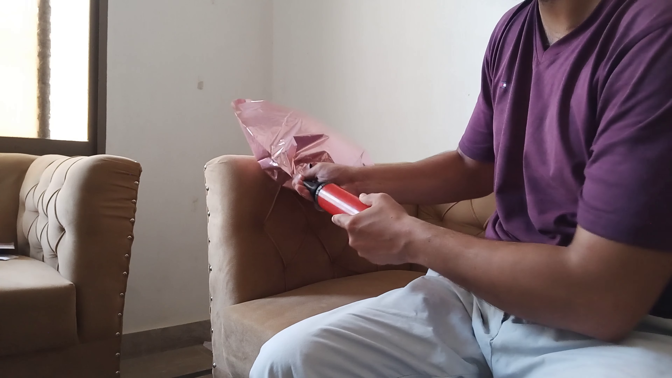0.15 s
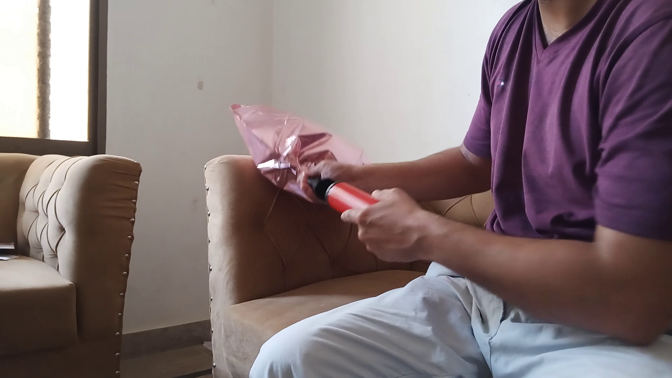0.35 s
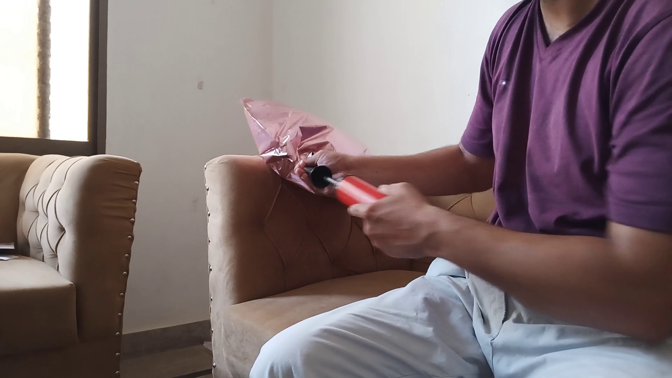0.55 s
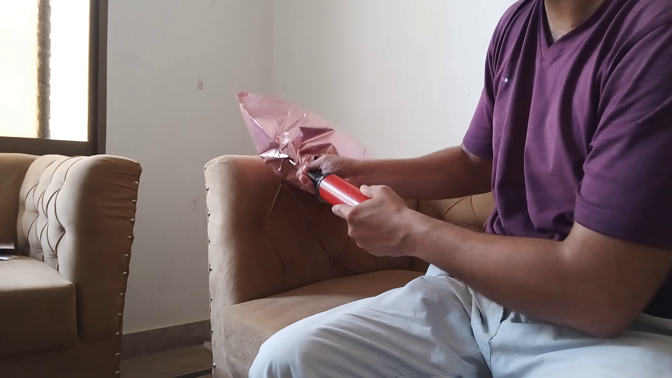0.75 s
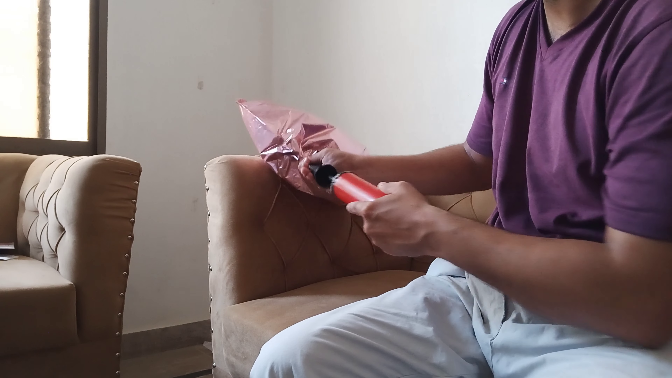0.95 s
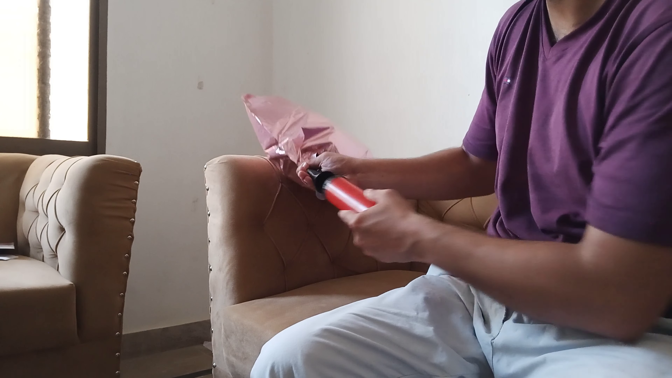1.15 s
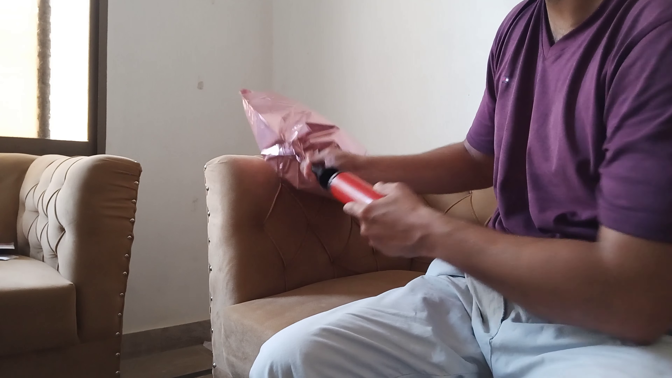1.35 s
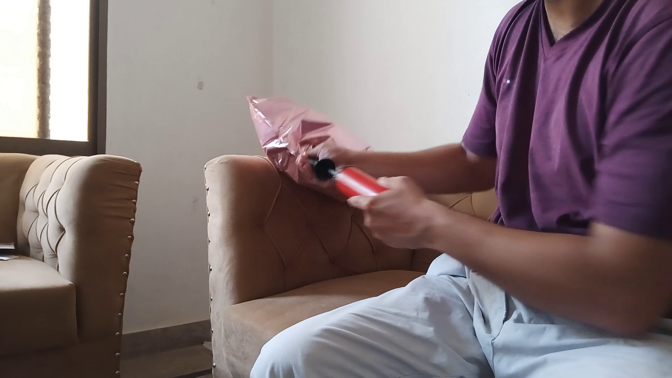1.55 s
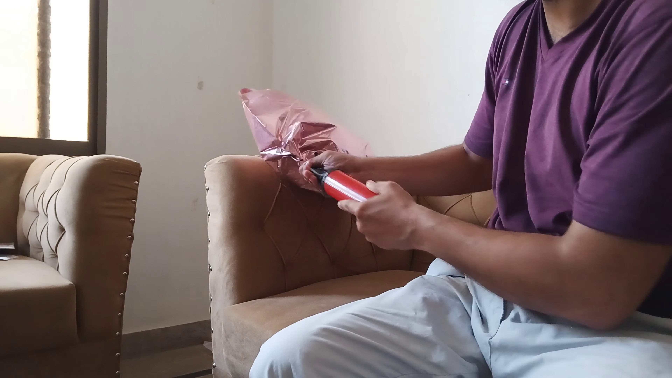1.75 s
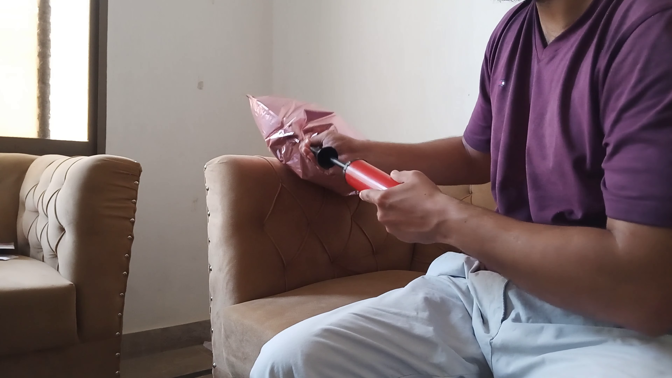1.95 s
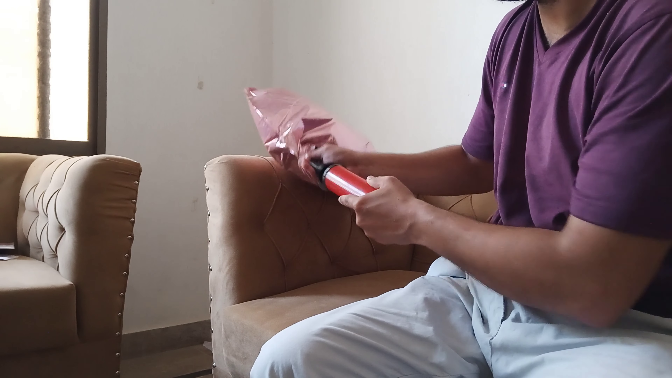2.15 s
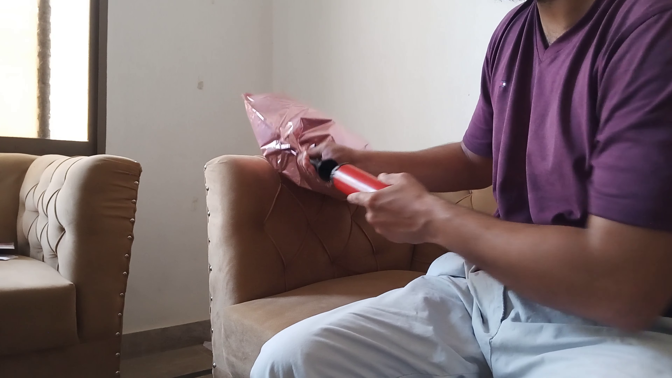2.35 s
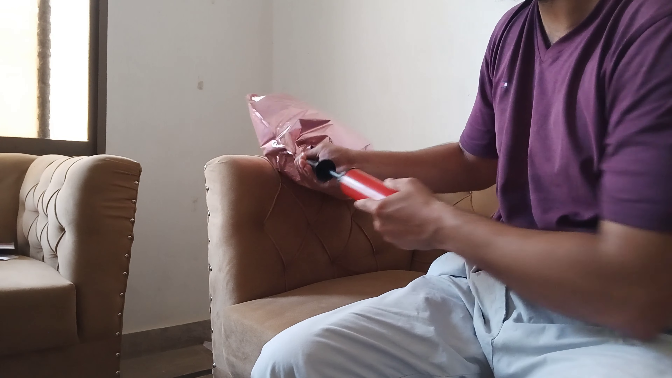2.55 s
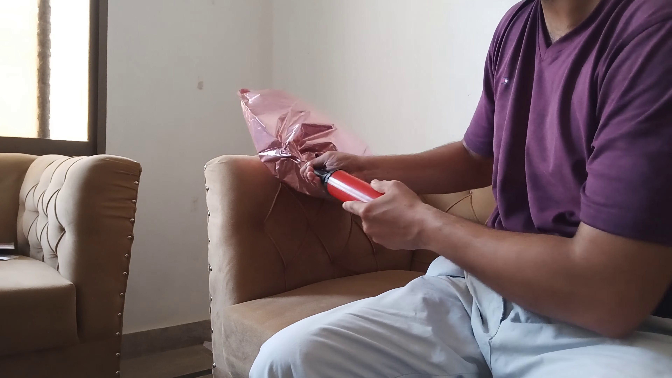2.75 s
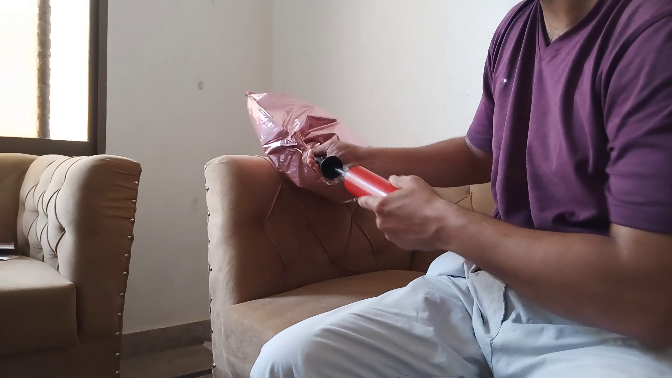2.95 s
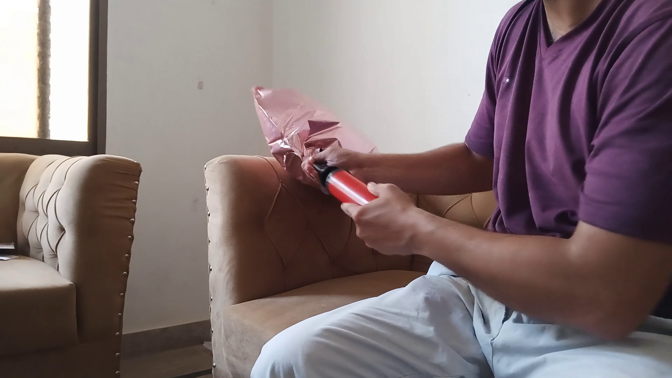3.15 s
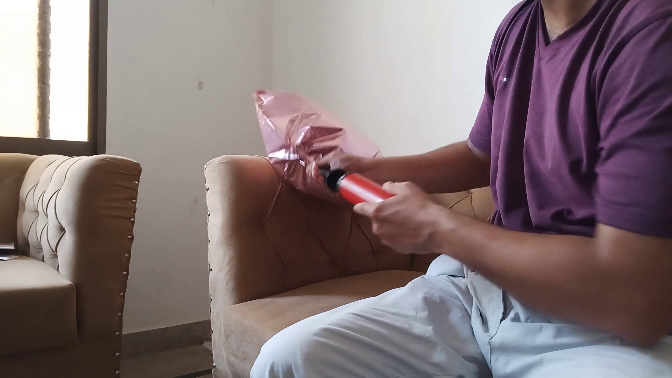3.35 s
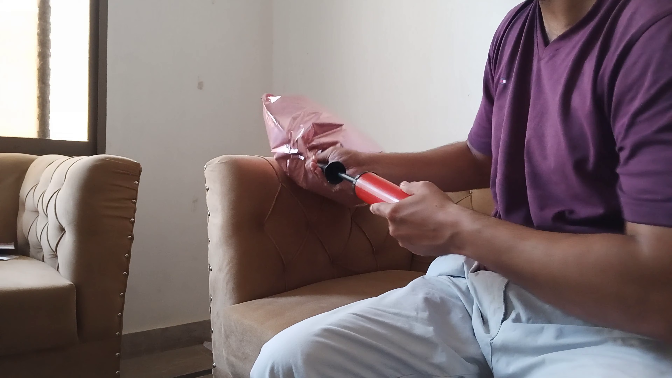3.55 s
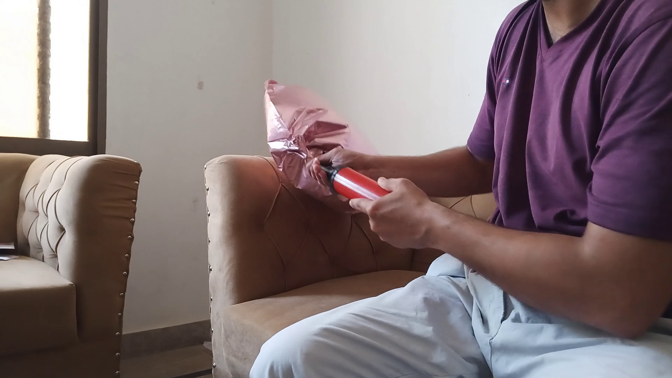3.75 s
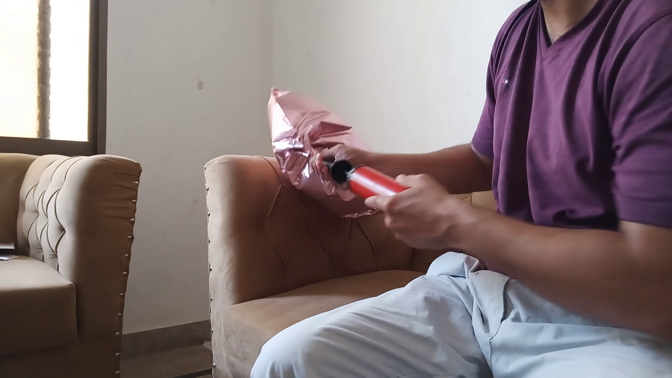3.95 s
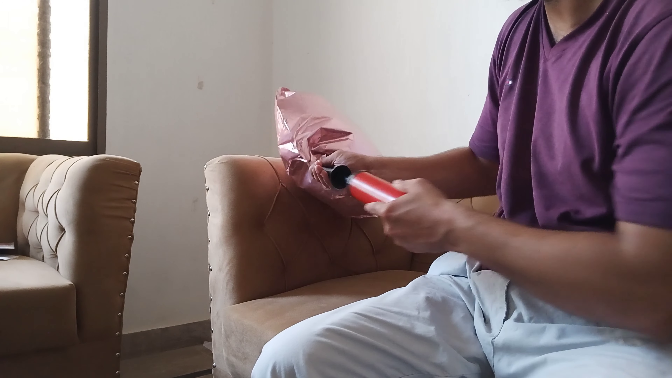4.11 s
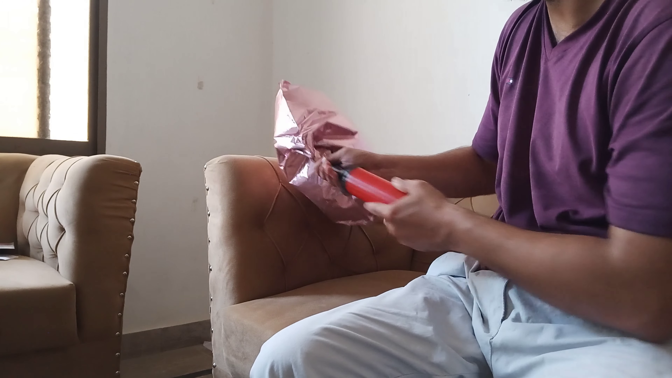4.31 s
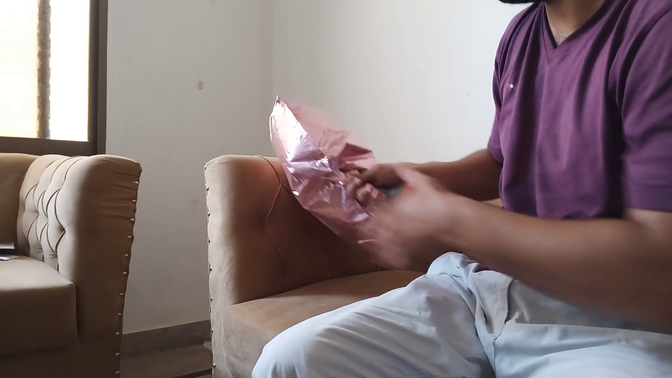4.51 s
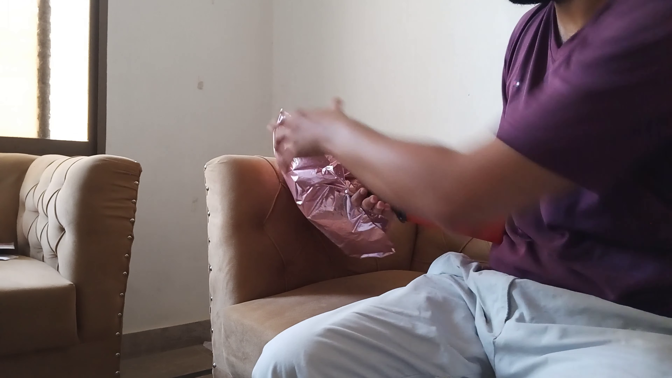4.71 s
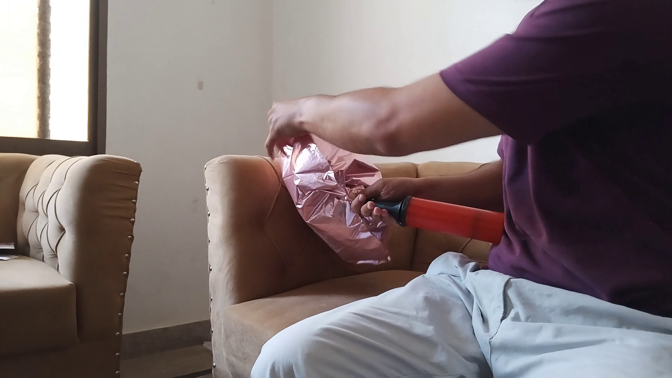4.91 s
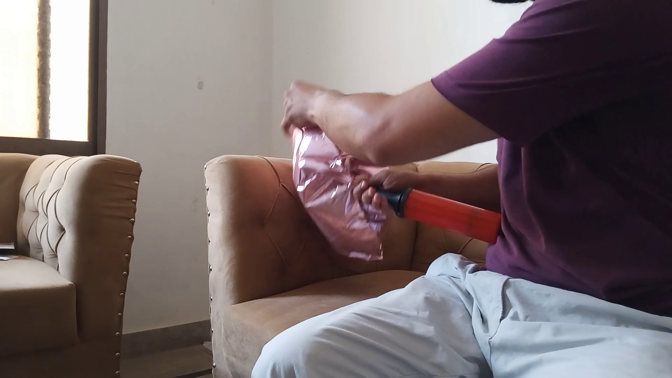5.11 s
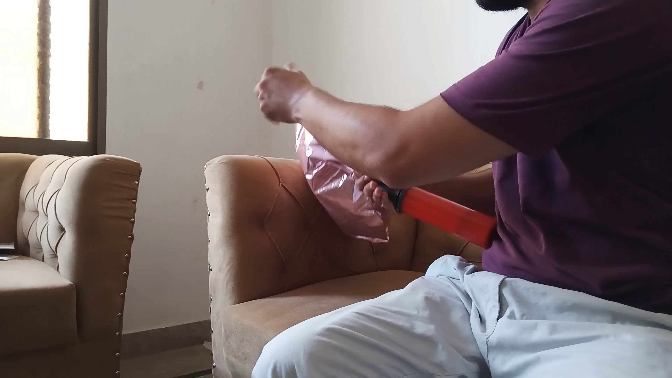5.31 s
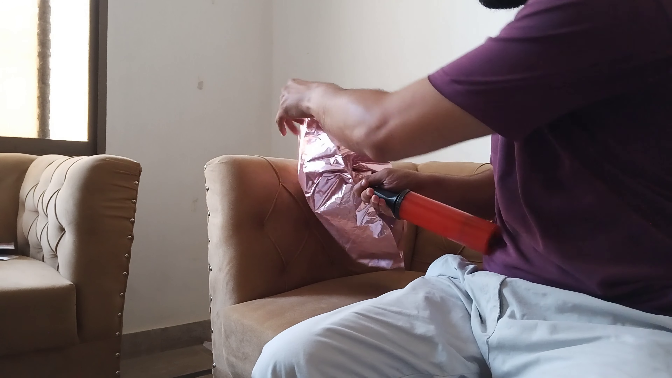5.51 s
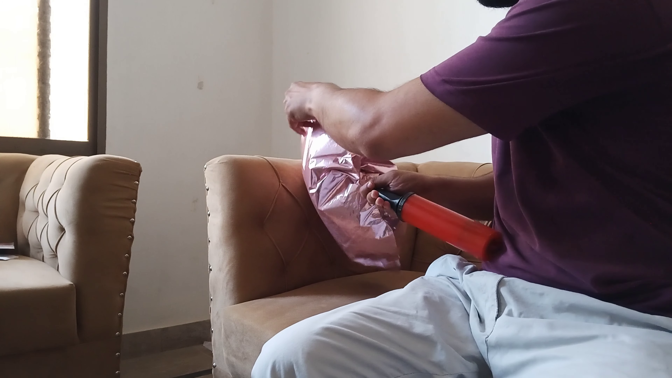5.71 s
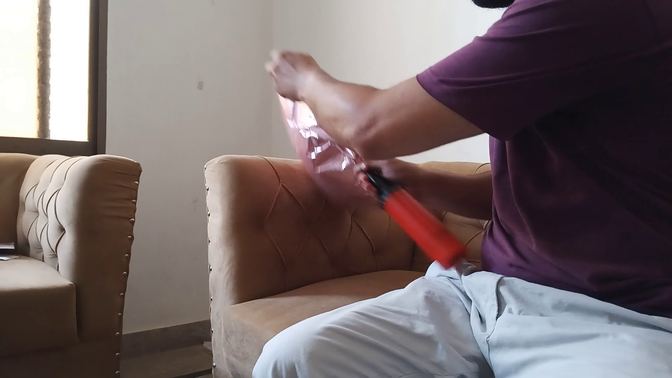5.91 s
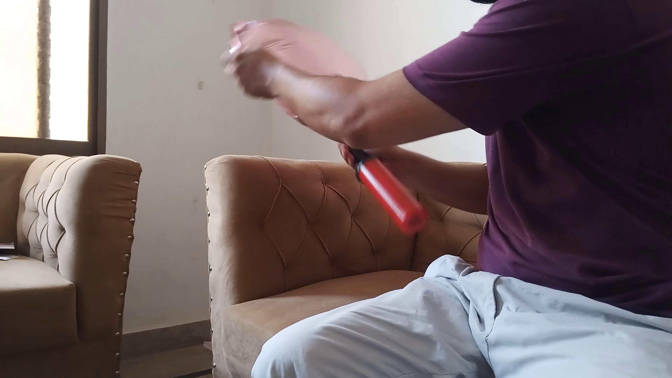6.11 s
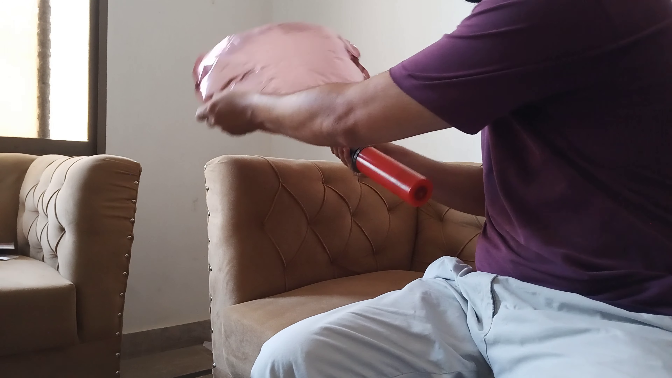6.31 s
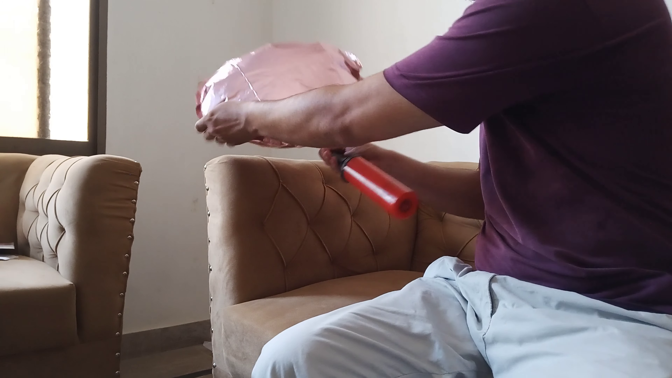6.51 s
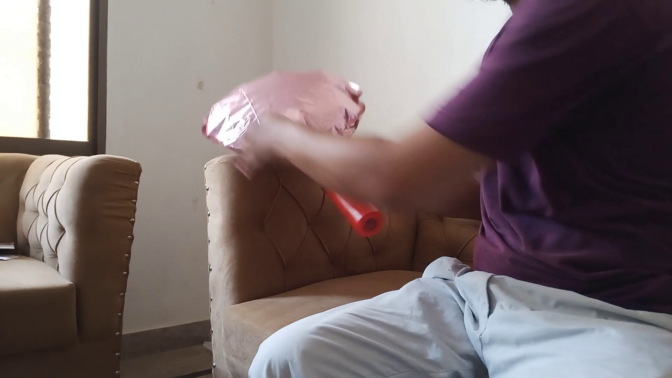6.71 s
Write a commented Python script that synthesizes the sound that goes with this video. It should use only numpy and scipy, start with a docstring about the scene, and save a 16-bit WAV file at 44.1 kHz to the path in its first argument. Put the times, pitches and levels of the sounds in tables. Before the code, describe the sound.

A plastic hand pump fills a foil balloon in a small, upholstered living room, heard close with a short dull reverberation. From 0 to 4 s, eight pushes come at roughly half-second spacing, near 0.3, 0.8, 1.3, 1.75, 2.25, 2.8, 3.3 and 3.8 s. Each is a brief, bright, noisy burst of air, about a tenth of a second, with a slight breathy neck resonance that rises in pitch overall, highest in the last two. The first is weaker. A much softer intake hiss precedes each; valve clacks, rod ticks and soft knocks punctuate the strokes. A low rumble lies beneath, with a faint drone from about 2.6 to 4.5 s. From 4 s, quiet irregular rubbing and foil crinkles continue, most noticeable around 4.6 to 4.9 s, with tiny snaps and a very faint flickering high whistle, chirping until the end near 7 s. Low room hum and faint background noise persist.

```python
"""A plastic hand pump fills a foil balloon in a living room: the barrel draws air in with a soft hiss, then each of
eight pushes drives it out as a flaring jet that rings the balloon's neck, while valve and piston tick and knock.
A low rumble goes with the pumping, and a faint drone joins it later. Then sleeve and foil rustle with snapping
creases, while a thin whistle flickers and chirps. Noise is shaped by spectra, resonances and stroke envelopes;
hum and whistle are sines. Room tone and hum lie beneath it all."""
import sys
import numpy as np
from scipy import signal
from scipy.fft import rfft, irfft, next_fast_len
from scipy.io import wavfile
from scipy.ndimage import uniform_filter1d

SR = 44100
rng = np.random.default_rng(int(sys.argv[2]) if len(sys.argv) > 2 else 0)


def inscribe(sig):
    """Save sig as 16-bit PCM at rate SR to the path in sys.argv[1].

    A 1-D sig is mono; a 2-D sig holds one channel per row.
    Samples are clipped to [-1, 1] before scaling.
    """
    pcm = np.round(np.clip(np.atleast_2d(sig).T, -1, 1) * 32767)
    wavfile.write(sys.argv[1], SR, pcm.astype(np.int16))


N = 298557
TIME = np.arange(N) / SR


def undb(db):
    """Level law: decibels to amplitude gain."""
    return 10 ** (np.asarray(db) / 20)


def unit(x):
    """Power normalisation: scale to rms 1."""
    return x / np.sqrt(np.mean(x ** 2))


def gate(start, end, fade):
    """Equal-power fading: one between two times in seconds, with sloping edges."""
    return np.sqrt(np.clip(np.minimum(TIME - start, end - TIME) / fade, 0, 1))


def bell(middle, length):
    """Gaussian envelope: a smooth swell, at half its height at the ends of its length."""
    return 0.5 ** ((2 * (TIME - middle) / length) ** 2)


def stroke(start, length, attack, sag, release):
    """Driven rise and decay: it rises, slackens (dB per s) and after its length also dies away (dB per s)."""
    age = np.maximum(TIME - start, 0)
    overrun = np.maximum(age - length, 0)
    return (1 - np.exp(-age / attack)) * undb(-sag * age - release * overrun)


def colour(x, points):
    """Spectral shaping: filter by a (Hz, dB) curve, interpolated over log frequency."""
    hz, db = np.transpose(points)
    size = next_fast_len(N + SR // 10)
    bins = np.maximum(np.fft.rfftfreq(size, 1 / SR), 1)
    gain = undb(np.interp(np.log(bins), np.log(hz), db))
    return irfft(rfft(x, size) * gain, size)[:N]


def resonate(x, hz, width):
    """Cascaded resonance: two equal peaks in series steepen the skirts."""
    b, a = signal.iirpeak(hz, hz / width, fs=SR)
    return signal.lfilter(b, a, signal.lfilter(b, a, x))


def walk(rate):
    """Low-passed randomness: a smooth wander at a rate in Hz, rms 1."""
    hold = int(SR / rate)
    steps = np.repeat(rng.standard_normal(N // hold + 1), hold)
    smooth = uniform_filter1d(uniform_filter1d(steps, hold), hold)
    return unit(smooth[:N])


def crackle(rate, spread_db):
    """Random impulse process: tiny snaps (mean rate per s), a few much larger than the rest."""
    sizes = undb(spread_db * np.minimum(rng.exponential(size=N), 4)) * rng.choice([-1, 1], N)
    return unit((rng.random(N) < rate / SR) * sizes)


def turbulence(spectrum, flutter_db):
    """Turbulent flow noise: its strength flutters as eddies shed."""
    return unit(colour(rng.standard_normal(N), spectrum) * undb(flutter_db * walk(rate=140)))


def narrow_noise(hz, width):
    """Narrow-band noise: two random quadrature envelopes on one carrier, whose pitch may move."""
    phase = 2 * np.pi * np.cumsum(hz * np.ones(N)) / SR
    return unit(walk(2 * width) * np.cos(phase) + walk(2 * width) * np.sin(phase))


def tick(s, hz, width, t60):
    """Impact excitation: a dying noise burst through one resonance, peak 1."""
    age = np.arange(SR // 5) / SR
    burst = resonate(rng.standard_normal(len(age)) * undb(-60 * age / t60), hz, width)
    return np.pad(burst / np.abs(burst).max(), (int(s * SR), N))[:N]


# The neck's pitch falls through this fraction either side of its centre; a weaker resonance lies an octave up.
NECK_SAG, NECK_UPPER_RATIO, NECK_UPPER_DB = 0.05, 2.05, -4


def neck(start, travel, hz, width):
    """Jet-driven resonance: the folded neck rings in two bands that sag while the piston travels."""
    centre = hz * np.interp(TIME, [start, start + travel], [1 + NECK_SAG, 1 - NECK_SAG])
    upper = narrow_noise(NECK_UPPER_RATIO * centre, NECK_UPPER_RATIO * width)
    return narrow_noise(centre, width) + undb(NECK_UPPER_DB) * upper


# Air driven out; the neck folds anew on every push and sings at another place. Each row: start in seconds,
# piston travel in seconds, relative level in dB, neck centre in Hz, neck width in Hz, neck level against
# the push in dB, neck release in dB per second.
PUSH_STROKES = [(0.292, 0.13, -10, 505.3, 120.2, -14, 110), (0.807, 0.095, -7, 823.4, 104.7, -8, 450.5),
                (1.261, .11, -5, 750.6, 220, -19.5, 160), (1.748, .13, -6.5, 900, 257.3, -12.5, 148),
                (2.26, .118, -7, 788.6, 149.9, -13, 170), (2.778, .091, -6.5, 979, 339.4, -16, 120),
                (3.275, 0.12, -5.6, 1334, 319, -10, 96.5), (3.798, .13, -6.5, 1292, 240, -11.5, 72)]
# Spectrum of the jet and of the crackling foil. Each row: frequency in Hz, relative density in dB per Hz.
JET_SPECTRUM = [(40, -35.5), (150, -20), (300, -18), (450, -11.5), (700, -2), (1100, -6), (1700, -3),
                (3000, -3.5), (4200, -1), (6500, -1), (15000, -2.5), (20000, -31)]
# A push builds up, slackens against the rising pressure, and dies away when the piston stops.
PUSH_ATTACK_S, PUSH_SAG_DB_PER_S, PUSH_RELEASE_DB_PER_S = 0.05, 67.5, 167.5
# Air seeps out around the start of the push, as the hand turns round.
SEEP_DB, SEEP_S = -24.5, 0.028
# The fold is driven for this first share of the travel, then dies away.
NECK_SHARE = 0.65


def pushes(swell_lag_s=0.049):
    """Jet noise and resonance: the jet hisses, rings the neck and crackles the foil; a low rush swells later."""
    flow, ring = np.zeros(N), np.zeros(N)
    for start, travel, db, hz, width, neck_db, neck_release in PUSH_STROKES:
        drive = undb(db) * stroke(start, travel, PUSH_ATTACK_S, PUSH_SAG_DB_PER_S, PUSH_RELEASE_DB_PER_S)
        seep = undb(db + SEEP_DB) * np.exp(-np.abs(TIME - start) / SEEP_S)
        flow += np.hypot(drive, seep)
        singing = stroke(start, NECK_SHARE * travel, PUSH_ATTACK_S, PUSH_SAG_DB_PER_S, neck_release)
        ring += undb(db + neck_db) * singing * neck(start, travel, hz, width)
    jet = undb(2.0) * turbulence(JET_SPECTRUM, flutter_db=0.6)
    foil = undb(-10.5) * unit(colour(crackle(rate=1800, spread_db=3.5), JET_SPECTRUM))
    late_flow = np.interp(TIME - swell_lag_s, TIME, flow)
    swell = undb(-33.5) * late_flow * narrow_noise(hz=435.0, width=230)
    return flow * (jet + foil) + ring + swell


# Air drawn in, one swell for each pull. Each row: middle in seconds, length in seconds, relative level in dB.
PULL_SWELLS = [(0.132, 0.19, -34.5), (0.639, 0.16, -35), (1.108, 0.15, -31.5), (1.58, 0.17, -31.5),
               (2.073, 0.18, -36), (2.593, 0.17, -40.5), (3.104, 0.15, -31), (3.612, 0.14, -33.5)]
# Spectrum of the inlet hiss. Each row: frequency in Hz, relative density in dB per Hz.
INTAKE_SPECTRUM = [(40, -24), (130, -4.5), (350, -5), (600, -6), (1200, -6.5), (2400, -2.5), (4200, 0),
                   (6300, 1), (9000, -1), (15000, -4.5), (20000, -19)]


def pulls():
    """Inlet flow noise: the barrel refills through its narrow inlet, loudest in the middle of the pull."""
    flow = sum(undb(db) * bell(middle, length) for middle, length, db in PULL_SWELLS)
    return undb(3.5) * flow * turbulence(INTAKE_SPECTRUM, flutter_db=0.7)


# The valve flap lifts and lets a little air past before a push. Each row: time in seconds, relative level
# in dB, approximate length of the leak in seconds.
FLAP_LIFTS = [(1.2071, -19, 0.07), (1.684, -20, 0.014), (3.2272, -19, .055)]


def valve(flap_hz=1650, overtone_hz=3450, t60=0.016):
    """Damped modes and leakage: the flap clacks in two resonances, then air whispers past it."""
    out = np.zeros(N)
    leak = undb(-19) * narrow_noise(hz=1780, width=540)
    for s, db, length in FLAP_LIFTS:
        clack = tick(s, flap_hz, 571, t60) + undb(-6.5) * tick(s, overtone_hz, 900, t60)
        whisper = leak * gate(s + 0.0092, s + 0.0096 + length, fade=0.006)
        out += undb(db) * (clack + whisper)
    return out


# The pump ticks, pops and knocks as it is worked: short bursts at the start of some pushes, a harder knock as
# the second push ends. Each row: time in seconds, peak before the room in dB, centre in Hz, burst t60 in
# seconds.
PUMP_TICKS = [(0.1592, -15.5, 4160, 0.024), (0.162, -20.5, 650, .018), (0.245, -23, 2160, 0.02),
              (0.901, -8, 704, 0.014), (2.199, -27, 3570, 0.009), (2.723, -25.5, 5000, .014),
              (2.782, -16, 3000, .06), (3.176, -24, 1600, 0.012), (3.18, -29.5, 400, 0.021),
              (3.7913, -16.5, 3000, 0.07)]
# The piston knocks softly just after the end of its travel.
KNOCK_LAG_S, KNOCK_HZ, KNOCK_T60_S, KNOCK_DB = 0.00773, 310, 0.044, -27


def pump_ticks():
    """Struck plastic: broad damped resonances tick along the way and knock after every push."""
    single = sum(undb(db) * tick(s, hz, hz, t60) for s, db, hz, t60 in PUMP_TICKS)
    knocks = sum(tick(start + travel + KNOCK_LAG_S, KNOCK_HZ, KNOCK_HZ, KNOCK_T60_S)
                 for start, travel, *_ in PUSH_STROKES)
    return single + undb(KNOCK_DB) * knocks


# Sleeve and foil rub under the hands, one row for each move. Each row: start in seconds, length in seconds,
# relative level in dB.
RUB_MOVES = [(4.007, 0.19, -44), (4.34, 0.11, -56), (4.583, 0.29, -39), (5.185, 0.43, -49.5),
             (5.438, 0.28, -42), (5.702, 0.13, -46.5), (5.866, 0.35, -45.5), (5.986, 0.034, -44),
             (6.47, 0.23, -50.5)]
# Spectrum of the rubbing. Each row: frequency in Hz, relative density in dB per Hz.
RUSTLE_SPECTRUM = [(40, -2.5), (150, 8.5), (400, 5.5), (800, 3), (1300, 0), (3000, 0.5), (5500, 1),
                   (9000, 0), (15000, -3), (20000, -14)]
RUB_ATTACK_S, RUB_SAG_DB_PER_S, RUB_RELEASE_DB_PER_S = 0.029, 23.5, 136


def handling():
    """Friction noise: cloth and skin slide over the foil, with fine crinkles and small settling snaps."""
    power = np.zeros(N)
    for start, length, db in RUB_MOVES:
        power += (undb(db) * stroke(start, length, RUB_ATTACK_S, RUB_SAG_DB_PER_S, RUB_RELEASE_DB_PER_S)) ** 2
    moves = np.sqrt(power) * undb(1.0 * walk(rate=27))
    rub = undb(0.3) * turbulence(RUSTLE_SPECTRUM, flutter_db=1.0)
    # three bands of creases, each with its own snaps
    crinkle = sum(unit(resonate(crackle(rate=430, spread_db=5.0), hz, hz / 2)) for hz in (3800, 5200, 7000))
    # lone snaps continue from the first move to the end
    settling = (TIME > RUB_MOVES[0][0]) * unit(colour(crackle(rate=36, spread_db=1.5), INTAKE_SPECTRUM))
    return moves * (rub + undb(-13.5) * crinkle) + undb(-66.0) * settling


# Single creases snap in the foil. Each row: time in seconds, peak before the room in dB, burst t60 in seconds.
CREASE_SNAPS = [(4.441, -38, .006), (4.573, -38.5, .016), (4.647, -31, .007), (4.700, -25.5, .01),
                (4.873, -43, .005), (5.204, -37, .009), (5.639, -38, .006), (6.734, -39, 0.053)]
SNAP_HZ, SNAP_WIDTH_HZ = 4160, 4400


def creases():
    """Buckling foil: each crease gives a short burst through one broad treble resonance."""
    return sum(undb(db) * tick(s, SNAP_HZ, SNAP_WIDTH_HZ, t60) for s, db, t60 in CREASE_SNAPS)


# Course of the faint whistle. Each row: time in seconds, mean pitch in Hz.
WHISTLE_PITCH = [(4.6, 3080), (4.9, 3060), (5.1, 3070), (5.22, 3170), (5.4, 3170), (5.55, 3100),
                 (5.9, 3050), (6.1, 3040), (6.35, 3080)]
# Short swells of the whistle. Each row: middle in seconds, level before the flicker in dB.
WHISTLE_CHIRPS = [(4.92, -57), (4.978, -58), (5.212, -55), (5.72, -58), (5.79, -49), (6.09, -55),
                  (6.24, -59), (6.75, -53)]
WHISTLE_DB, CHIRP_S = -66.5, 0.027


def whistle():
    """Frequency and amplitude modulation: a weak high sine wavers, flickers and swells into chirps."""
    s, hz = np.transpose(WHISTLE_PITCH)
    pitch = np.interp(TIME, s, hz) * (1 + 0.004 * walk(rate=120))
    steady = undb(WHISTLE_DB) * gate(s[0], s[-1], fade=0.05)
    chirps = sum(undb(db) * bell(middle, CHIRP_S) for middle, db in WHISTLE_CHIRPS)
    flicker = undb(3.6 * walk(rate=50))
    return (steady + chirps) * flicker * np.sin(2 * np.pi * np.cumsum(pitch) / SR)


def hollow():
    """Low resonances: arms and sofa rumble during the pumping; the filling balloon later drones faintly."""
    wander = undb(-56.5 + 2 * walk(rate=7.9))
    rumble = wander * gate(0, 4.1, fade=0.11) * narrow_noise(hz=108.6, width=77)
    drone = undb(-55.5) * gate(2.6, 4.52, fade=0.42) * narrow_noise(hz=309.5, width=59)
    return rumble + drone


# Hum in the room. Each row: frequency in Hz, mean peak level in dB.
HUM_TONES = [(70, -67), (101, -80.5)]
# Spectrum of the background noise. Each row: frequency in Hz, relative density in dB per Hz.
ROOM_SPECTRUM = [(20, -42), (40, -17), (70, 0.5), (160, -2), (300, -7.5), (600, -13), (900, -12),
                 (1600, -19), (4000, -19.5), (8000, -25.5), (20000, -12.5)]
ROOM_TONE_DB = -52.5


def room_tone():
    """Stationary noise and tones: a low background with a hum of wavering level."""
    hum = sum(undb(db + 2.5 * walk(rate=6.7)) * np.sin(2 * np.pi * hz * TIME) for hz, db in HUM_TONES)
    noise = unit(colour(rng.standard_normal(N), ROOM_SPECTRUM))
    return hum + undb(ROOM_TONE_DB + 0.4 * walk(rate=1.3)) * noise


# Early echoes from the walls of the corner. Each row: delay in seconds, gain as a factor on the direct sound.
WALL_ECHOES = [(.005, 0.12), (.0034, 0.027)]
# decay of the tail, and its level before the treble damping
ROOM_T60_S, ROOM_DB = 0.33, -6.5


def room(x, damping_hz=3000):
    """Reflection and absorption: near walls comb the sound; upholstery soaks up the short tail's treble."""
    age = np.arange(SR // 2) / SR
    tail = rng.standard_normal(len(age)) * undb(-60 * age / ROOM_T60_S) * (age > 0.006)
    tail = undb(ROOM_DB) * tail / np.linalg.norm(tail)
    response = signal.lfilter(*signal.butter(1, damping_hz, fs=SR), tail)
    response[0] = 1  # the direct sound
    for delay, gain in WALL_ECHOES:
        response[round(delay * SR)] += gain
    return signal.fftconvolve(x, response)[:N] / np.linalg.norm(response)


def scene():
    """Superposition: pump and balloon sound in the room, alike in both channels."""
    pump = pushes() + pulls() + valve() + pump_ticks() + hollow()
    balloon = handling() + creases()
    mono = room(pump + balloon) + whistle() + room_tone()
    return np.array([mono, mono])


# Response of the microphone. Each row: frequency in Hz, gain in dB.
MICROPHONE_RESPONSE = [(3000, -0.5), (5000, 0.5), (6500, 5.5), (7300, 0), (8300, -8), (11000, -14.5),
                       (13000, -21), (13900, -16), (14900, -7), (16000, -7.5)]
TOP_HZ = 15650


def record(dry):
    """Transducer response: the microphone port rings twice in the treble; a steep low-pass cuts the top."""
    heard = np.array([colour(channel, MICROPHONE_RESPONSE) for channel in dry])
    return signal.sosfilt(signal.ellip(12, 0.2, 80, TOP_HZ, fs=SR, output="sos"), heard)


dry = scene()
out = record(dry)
inscribe(out)
```